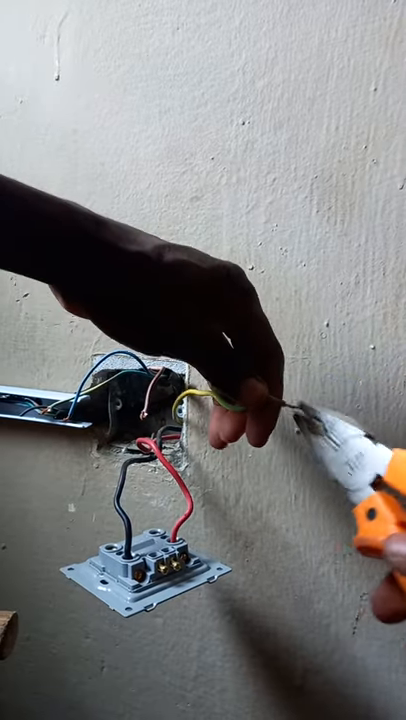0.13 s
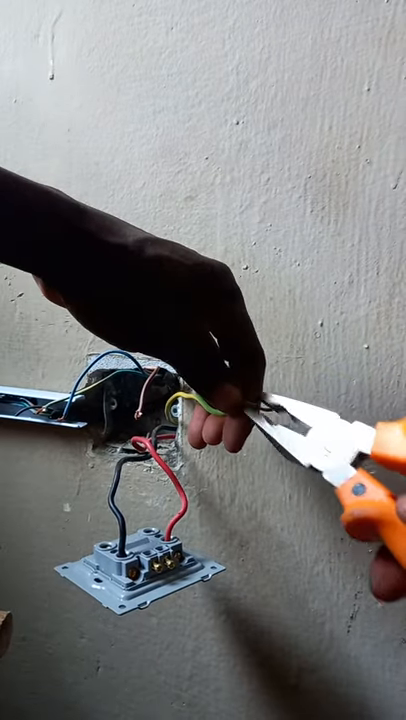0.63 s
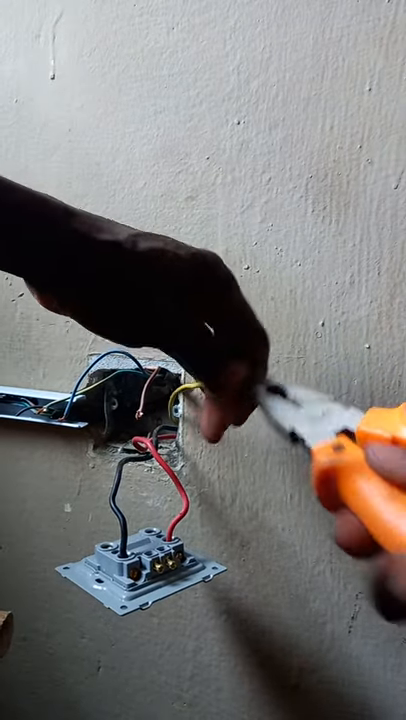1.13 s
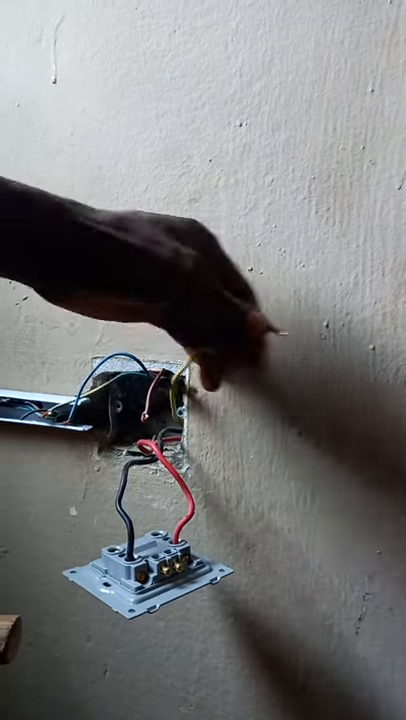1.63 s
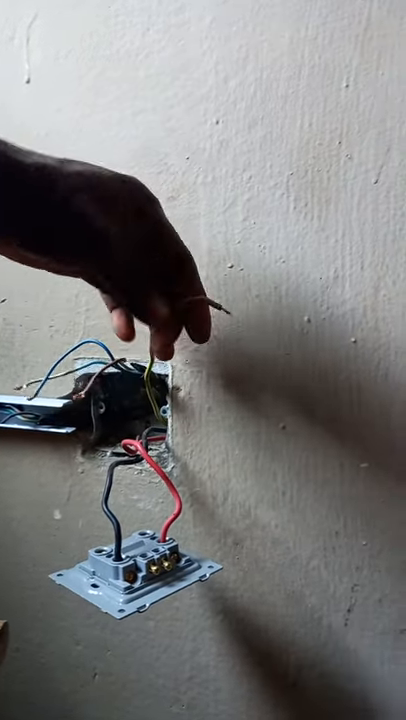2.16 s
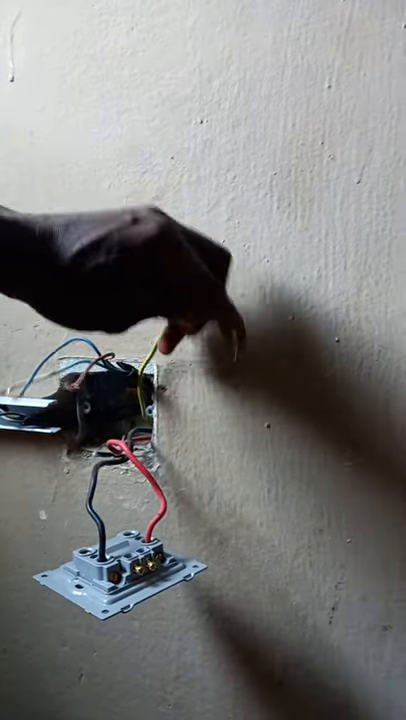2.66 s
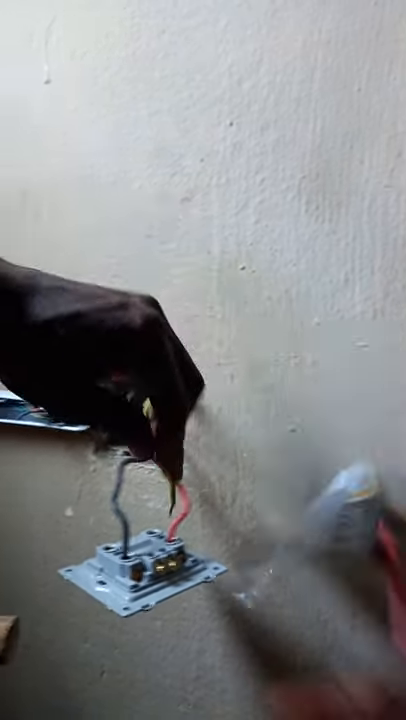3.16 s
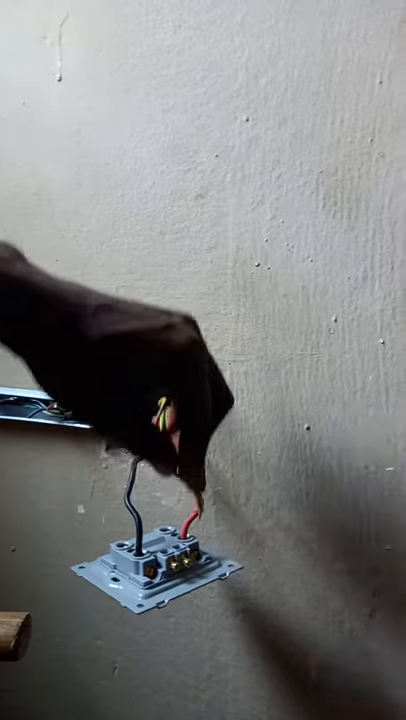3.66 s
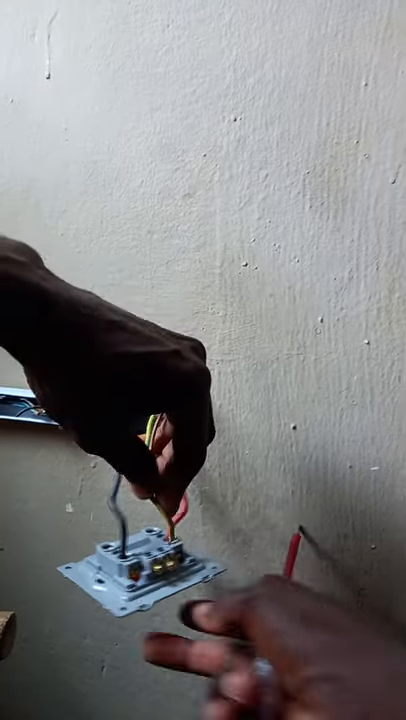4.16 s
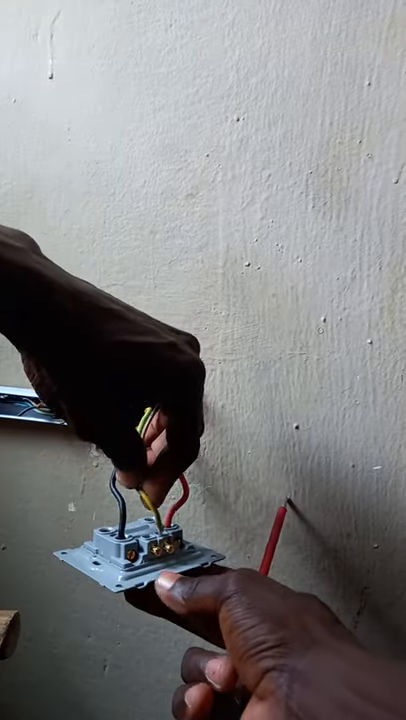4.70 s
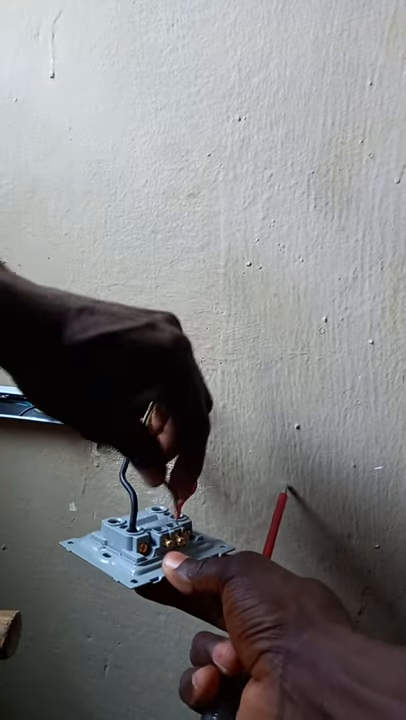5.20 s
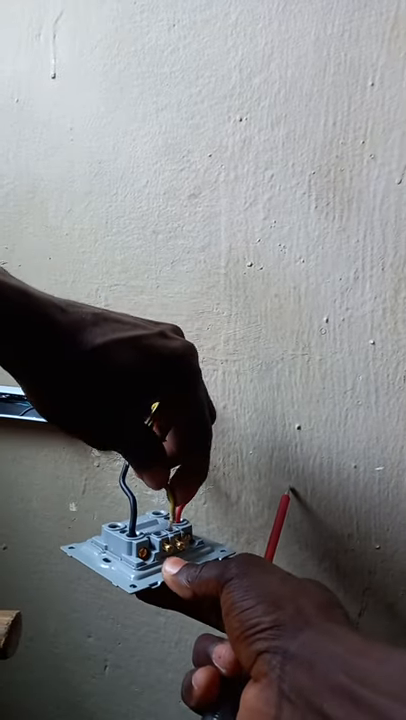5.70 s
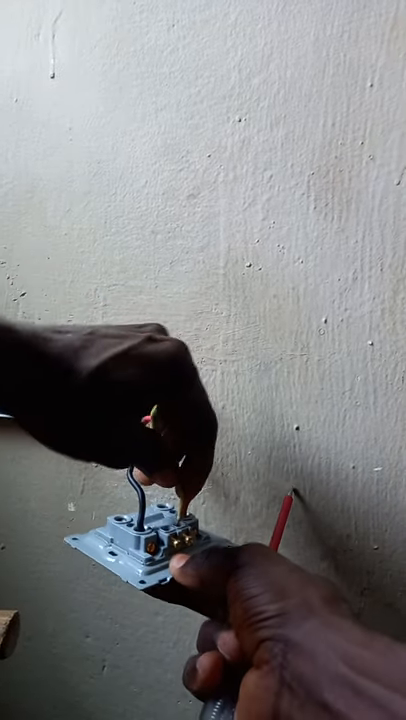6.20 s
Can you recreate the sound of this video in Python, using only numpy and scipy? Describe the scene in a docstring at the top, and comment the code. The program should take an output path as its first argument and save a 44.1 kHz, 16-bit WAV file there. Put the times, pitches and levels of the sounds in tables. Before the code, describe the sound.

Pliers nip a wire and clatter onto a bench, a plastic bag of steel tools crinkles and jingles, then small terminal clicks over faint traffic.

```python
"""Pliers, a bag of tools and a switch terminal

In a small hard-walled room with distant traffic, two microphones stand a hand apart.
Pliers nip and slip off a wire end, then are laid down clattering on a bench: ticks and grit ring their modes.
A plastic bag of steel tools is picked up, crinkling in clumps of grit and jingling in high steel modes.
Last, a wire is pushed into a switch terminal with small clicks. Traffic and hiss are narrow bands of noise."""
import sys
import numpy as np
from scipy import signal
from scipy.io import wavfile

SR = 44100
rng = np.random.default_rng(int(sys.argv[2]) if len(sys.argv) > 2 else 0)


def makeup_ratio(level_db):
    """Linear amplitude ratio for a level in decibels (20 dB per factor of ten)."""
    decades = np.asarray(level_db, float) / 20
    return 10 ** decades


def materialize(psi):
    """Save the field psi as 16-bit PCM at rate SR to the path in sys.argv[1].

    A 1-D psi becomes a single channel; in a 2-D psi each row is a channel.
    """
    bounded = np.clip(np.atleast_2d(psi).T, -1, 1)
    quanta = np.round(bounded * 32767).astype(np.int16)
    wavfile.write(sys.argv[1], SR, quanta)


N = 278878

# The four bands of every contact: lows, mids, treble, air. Each row: low edge in Hz, high edge in Hz.
BANDS = [(300, 1166), (1500, 4252), (5000, 16540), (10000, 15050)]


def at_hz(points, hz):
    """Read a table on a log-frequency axis."""
    table_hz, values = np.array(points)[:, 0], np.array(points)[:, 1]
    return np.interp(np.log(hz), np.log(table_hz), values)


def in_time(rows):
    """Level columns over time; the first is silent outside the table."""
    s, first, *rest = np.transpose(rows)
    t = np.arange(N) / SR
    return [np.interp(t, s, first, left=-150, right=-150)] + [np.interp(t, s, c) for c in rest]


def band(x, low_hz, high_hz):
    """Band-pass that keeps the rms of white noise."""
    sos = signal.butter(2, [low_hz, min(high_hz, .45 * SR)], "band", fs=SR, output="sos")
    return signal.sosfilt(sos, x + 1e-18) * np.sqrt(SR / 2 / (high_hz - low_hz))


def drift(rate):
    """Slow chance, spread 1: noise through two equal poles, one value every 40 samples."""
    r = np.exp(-80 * np.pi * rate / SR)
    noise = rng.standard_normal(N // 40 + 2002)
    slow = signal.lfilter([1], [1, -2 * r, r * r], noise)[2000:]
    return np.interp(np.arange(N) / 40, np.arange(len(slow)), slow / slow.std())


def ring(force, modes):
    """A force sets every mode of a body ringing; modes are (Hz, dB, t60 in s)."""
    out = 0
    for hz, level_db, t60 in modes:
        r, w = makeup_ratio(-60 / (t60 * SR)), 2 * np.pi * hz / SR
        struck = [0, makeup_ratio(level_db) * np.sin(w)]
        out = out + signal.lfilter(struck, [1, -2 * r * np.cos(w), r * r], force + 1e-18)
    return out


def voiced(force, modes):
    """Forces by band become a crack plus the modes that lie in that band."""
    out = 0
    for k, (low, high) in enumerate(BANDS):
        inside = [m for m in modes if low <= m[0] < high]
        out = out + (-1) ** k * band(force[k], low, high) + ring(force[k], inside)
    return out


def grit(per_s, spread_db):
    """Random micro-clicks of uneven size, bands x channels; a wide source sounds partly unlike at each side."""
    # Share of each band (lows, mids, treble, air) that both microphones hear alike, 0 to 1.
    same_grit = [0.716, 0.13, 0.17, 0.13]
    struck = rng.random(N) < per_s / SR
    sizes = makeup_ratio(spread_db * np.minimum(rng.exponential(1, N), 4)) * struck
    shared, *own = rng.standard_normal((3, N))
    alike = np.clip(same_grit, 0, 1)[:, None, None]
    signs = np.sqrt(alike) * shared + np.sqrt(1 - alike) * np.array(own)
    return sizes / np.sqrt(np.mean(sizes ** 2)) * signs


def contacts(s, level_db, low_db, mid_db, ms, pan_db, rise_share, hold_share, tick_db, treble_db, air_db):
    """Each contact is one sharp tick, then a short run of grit that swells, holds and dies."""
    force, ticks = np.zeros((2, len(BANDS), 2, N))
    each = np.broadcast(s, level_db, low_db, mid_db, ms, pan_db)
    for start_s, level, low, mid, length_ms, pan in each:
        length = max(length_ms, .3) * SR / 1000
        rise, hold = rise_share * length + 2, hold_share * length
        k = np.arange(int(8 * length + rise))
        decay = np.exp(-np.maximum(k - rise - hold, 0) / (length - hold))
        shape = np.minimum(k / rise, 1) ** 2 * decay
        colour_db = np.array([low, mid, treble_db, air_db])[:, None]
        gains = makeup_ratio(level + colour_db + [pan / 2, -pan / 2])
        start = int(start_s * SR)
        force[:, :, start + k] += gains[:, :, None] * shape
        ticks[:, :, start] += gains * makeup_ratio(tick_db)
    return force * grit(14000, 1.6) + ticks


def rustle(rows, per_s, spread_db, clump_db, colour_db, dulling, pan_db):
    """Dense grit in clumps; the gentler the handling, the more the lower bands lead."""
    firm_db = -48  # handling gentler than this sounds duller
    treble_db, = in_time(rows)
    # dulling: dB per dB below firm, one for each band
    lead_db = np.array(dulling)[:, None] * (firm_db - treble_db) * (treble_db > -120)
    level = makeup_ratio(treble_db + np.array(colour_db)[:, None] + lead_db)
    clumps = makeup_ratio(clump_db * drift(40)) * makeup_ratio([[pan_db / 2], [-pan_db / 2]])
    return level[:, None] * clumps * grit(per_s, spread_db)


def traffic():
    """Narrow bands of far rumble and microphone hiss, each flickering a little."""
    # Colour of rumble and hiss. Each row: frequency in Hz, relative density in dB per Hz.
    colour = [(15, -38), (25, -2.5), (53, -6), (108, -6.5), (175, -22), (236, -11.5), (285, -17),
              (344, -9.5), (503, -11.5), (560, -11.5), (911, -9), (1400, -46.5), (1700, -33), (6740, -55.5),
              (16000, -47)]
    # The deep rumble swells. Each row: time in seconds, level in dB.
    rumble_swell = [(0, 3.5), (.45, 2), (.7, -1.34), (1.5, 1), (2.6, 1.92), (3.7, 1.85), (4.2, 0.49),
                    (4.8, 4), (5.1, -2), (5.7, -1.22), (6.33, -1)]
    # How alike the two microphones hear it. Each row: frequency in Hz, left-right likeness from -1 to 1.
    likeness = [(50, 1), (130, 0.54), (290, 0.9), (640, 0.49), (1400, -0.86), (3000, 0.29)]
    out, together = 0, drift(1.5)
    edges = 24 * 2 ** np.arange(0, 9.7, .4)
    white = rng.standard_normal((2, 2, N))
    swell_db = in_time(rumble_swell)[0]
    for k, (low, high) in enumerate(zip(edges, edges[1:])):
        mid, side = band(white[k % 2], low, high) * np.sqrt(high - low)
        hz = np.sqrt(low * high)
        alike = np.clip(at_hz(likeness, hz), -1, 1)
        flicker_db = 0.91 * together + 0.58 * drift(11)
        gain = makeup_ratio(at_hz(colour, hz) + flicker_db + swell_db * (hz < 130))
        out = out + gain * (np.sqrt(1 + alike) * mid + np.sqrt(1 - alike) * side * [[1], [-1]])
    return out / out.std() * makeup_ratio(-58.5)


def thuds():
    """The bench booms in low noise bands and one deep mode when weight shifts on it."""
    # Weight shifting on the bench. Each row: time of full weight in seconds, deep force in dB, boom force in dB.
    weight_shifts = [(2.296, -54, -47.5), (2.384, -45, -55.5), (2.93, -67.5, -59), (3.13, -44, -55),
                     (3.342, -47, -56), (3.6, -65.5, -63), (3.91, -55, -57.5)]
    lean_db_per_s, lift_db_per_s = 110.5, 179.5  # how fast the weight comes and goes
    s, *forces_db = np.transpose(weight_shifts)
    late = np.arange(N)[:, None] / SR - s
    swell = makeup_ratio(np.minimum(lean_db_per_s * late, -lift_db_per_s * late))
    deep, boom = rng.standard_normal((2, N)) * [swell @ makeup_ratio(db) for db in forces_db]
    out = makeup_ratio(-10.0) * band(deep, 28, 95)
    out = out + ring(deep, [(100.1, -23.5, 0.095)])
    out = out + band(boom, 150, 320)
    return out * makeup_ratio([[-1.2], [1.2]])


def ping():
    """One short tap, a burst of noise, rings a single high mode of the pliers' jaws by the wall."""
    # One row: time in seconds, mode level in dB, frequency in Hz, t60 in seconds.
    thin_ping = (1.219, -91, 11100, .1)
    s, level_db, hz, t60 = thin_ping
    tap = rng.standard_normal((2, N)) * (np.abs(np.arange(N) / SR - s) < .003)
    return ring(tap, [(hz, level_db, t60)])


def terminal():
    """The wire end scrapes and clicks in the terminal, whose small parts ring for a few ms."""
    # Wire end in the terminal. Each row: start in seconds, level in dB, mids in dB re level.
    terminal_clicks = [(4.329, -67.5, -2), (4.4687, -73, -6.5), (4.614, -51.5, -16.5), (4.796, -37, -14),
                       (4.807, -45.5, -14), (5.07, -72, -9.5), (5.1887, -71.5, -6.5), (5.835, -58, -15),
                       (5.8483, -39.5, -23), (5.8784, -48, -18.5), (5.891, -56, -14), (6.02, -73.5, -22.5)]
    # Modes of the terminal. Each row: frequency in Hz, level in dB, t60 in seconds.
    terminal_modes = [(2360, -10, 0.011), (2850, -12, .009), (3600, -11, 0.012), (9700, -11, 0.006)]
    s, level_db, mid_db = np.transpose(terminal_clicks)
    force = contacts(s, level_db, -21, mid_db, ms=6.56, pan_db=2.78, rise_share=0.21, hold_share=0.132,
                     tick_db=-4.0, treble_db=-14.5, air_db=-8.0)
    return voiced(force, terminal_modes)


def pliers_on_wire():
    """The jaws nip and slip off the wire, each tick and scrape ringing the short steel modes."""
    # Jaws on the wire. Each row: start in seconds, level in dB, mids in dB re level, scrape length in ms.
    wire_clicks = [(0.1107, -56, -10.5, 3.8), (0.125, -53, -14, 4.4), (0.136, -52, -10, 6.76),
                   (0.646, -64.5, -12.5, 7.8), (0.7, -68.5, -15.5, 5.7), (0.731, -64, -18, 5.2),
                   (0.8276, -66, -33.5, 3.8), (0.9053, -62, -29.5, 6.4), (1.397, -39, -17, 2.1),
                   (1.4, -33, -23, 2.3), (1.435, -30.5, -8, 3.39), (1.4384, -27, -12, 3.14),
                   (1.4444, -32, -13.5, 4.5), (1.4524, -32.5, -18.5, 3.9)]
    # Modes of the jaws. Each row: frequency in Hz, level in dB, t60 in seconds.
    jaw_modes = [(2780, -12, .01), (4250, -9, .01), (7700, -24, .004), (13300, -6, .002)]
    s, level_db, mid_db, ms = np.transpose(wire_clicks)
    force = contacts(s, level_db, -33, mid_db, ms, pan_db=0.5, rise_share=0.159, hold_share=0.32,
                     tick_db=13.5, treble_db=-13.0, air_db=-14.5)
    return voiced(force, jaw_modes)


def wall_work():
    """All work at the wall, thin in the bass: small parts give off little below the high-pass."""
    wall = pliers_on_wire() + ping() + terminal()
    return signal.sosfilt(signal.butter(2, 1911, "high", fs=SR, output="sos"), wall)


def bench_scuff():
    """The first soft touch swells slowly and rings the bench top."""
    # First touches on the bench. Each row: start in seconds, level in dB.
    scuffs = [(1.9, -52.5), (1.913, -50.5)]
    # Bench top under the first touch. Each row: frequency in Hz, level in dB, t60 in seconds.
    scuff_modes = [(798.7, -11.5, 0.022), (2500, -18, 0.0086)]
    s, level_db = np.transpose(scuffs)
    force = contacts(s, level_db, 3.1, -10, ms=9, pan_db=-5, rise_share=0.24, hold_share=0.25,
                     tick_db=0.5, treble_db=-11.5, air_db=-23.5)
    return voiced(force, scuff_modes)


def bench_slide():
    """Pliers sliding on the bench make dense grit with no modes."""
    # Pliers sliding. Each row: time in seconds, treble force in dB before colour.
    slide = [(1.9, -99.5), (1.93, -66.5), (2.08, -66), (2.184, -74), (2.238, -49), (2.42, -95.5)]
    force = rustle(slide, per_s=5000, spread_db=2.9, clump_db=3.0, colour_db=[6.5, 2, 4, -11.5],
                   dulling=[0.335, 0.25, 0.014, 0.019], pan_db=0.5)
    return voiced(force, [])


def bench_knocks():
    """The pliers land and rock, each knock ringing the handles."""
    # Landing and rocking. Each row: start in seconds, level in dB, lows in dB re level, mids in dB re level.
    knocks = [(1.989, -23, -12.5, -14), (2.068, -18, -22.5, -19), (2.111, -28.5, -13, -6.5),
              (2.147, -34.5, -15.5, -6), (2.175, -32, -18, -9.5), (2.217, -23, -12, -18.5),
              (2.239, -30.5, -7, -6), (2.283, -31.5, -6, -11.5), (2.315, -40, -1.5, -18.5)]
    # Modes of the handles. Each row: frequency in Hz, level in dB, t60 in seconds.
    handle_modes = [(950, -14, 0.06), (2767, -15, 0.02), (3900, -16, .012)]
    force = contacts(*np.transpose(knocks), ms=4.375, pan_db=-3.0, rise_share=0.13, hold_share=0.12,
                     tick_db=13.0, treble_db=-9.5, air_db=-24.5)
    return voiced(force, handle_modes)


def pliers_on_bench():
    """Touch, slide and knocks together; from this distance they sound dull above the low-pass."""
    bench = bench_knocks() + bench_scuff() + bench_slide()
    return signal.sosfilt(signal.butter(1, 9000, fs=SR, output="sos"), bench)


def jingle():
    """Each touch is a dying chatter of steel on steel that keeps the shafts' high modes singing."""
    # Steel shafts touching each other. Each row: start in seconds, strength in dB.
    shaft_touches = [(2.6888, -67), (2.7252, -71.5), (2.9761, -51), (3.0295, -53.5), (3.0964, -55),
                     (3.1527, -51), (3.1956, -50.5), (3.2294, -59.5), (3.3039, -59.5), (3.3273, -45),
                     (3.3518, -50), (3.4526, -47), (3.4794, -55), (3.5194, -55.5), (3.7405, -31),
                     (3.7564, -39), (3.7794, -50), (3.8094, -45), (3.825, -45.5), (3.8706, -45),
                     (3.9135, -44.5), (3.9684, -57)]
    # Modes of the shafts. Each row: frequency in Hz, level in dB, t60 in seconds.
    shaft_modes = [(10615, -10.5, 0.045), (10555, -10.5, .05), (10490, -20, .04), (10100, -26.5, .03),
                   (10300, -22, .03), (10870, -19, 0.03)]
    s, strength_db = np.transpose(shaft_touches)
    touches = np.zeros(N)
    touches[(s * SR).astype(int)] = makeup_ratio(strength_db)
    dying = signal.lfilter([1], [1, -np.exp(-1 / (0.0098 * SR))], touches + 1e-18)
    chatter = dying * grit(1600, 2.52)[2]  # grit as alike as in the treble band
    return ring(chatter, shaft_modes) * makeup_ratio([[1.5], [-1.5]])


def bag_film():
    """Folds of the bag snap over amid crinkling grit, and the film rings briefly."""
    # Folds snapping. Each row: start in seconds, level in dB, lows in dB re level, mids in dB re level.
    bag_snaps = [(2.625, -41.5, -42.5, -14), (2.6888, -49, -15.5, -19.5), (2.9158, -43.5, -1, -11),
                 (2.9302, -37, -9.5, -9.5), (2.9557, -43, 1, -31.5), (2.9707, -20.5, -30, -17),
                 (3.0454, -44, -4, -15), (3.0935, -24.5, -11, -12), (3.1507, -34, -4, -19.5),
                 (3.1702, -26, -15, -24), (3.2712, -37.5, -9.5, -9), (3.2833, -38.5, -12, -4),
                 (3.3149, -22, -11.5, -14.5), (3.3258, -27, -8.5, -33.5), (3.3424, -30, -3.5, -10),
                 (3.3521, -33.5, -7, -12), (3.3877, -38.5, -11.5, -14.5), (3.4187, -23, -26, -13),
                 (3.454, -35, -11, -23.5), (3.5234, -41, -32.5, -16.5), (3.7385, -18.5, -19, -24.5),
                 (3.745, -20, -25, -26), (3.775, -34.5, -29, -21.5), (3.8681, -22.5, -10, -38.5),
                 (3.91, -32.5, -32, -34), (3.966, -46, -16.5, -15), (4.115, -50, 6, -4.5),
                 (4.135, -57, 5, 2)]
    # The bag swings across. Each row: time in seconds, left over right in dB.
    bag_place = [(2.62, -8), (3.04, -3.5), (3.1, 11), (3.281, 2.5), (3.42, 12.5), (3.751, 16), (4.12, -4.5)]
    # How hard the bag is handled. Each row: time in seconds, treble force in dB before colour.
    handling = [(2.48, -99), (2.512, -86), (2.62, -90.5), (2.624, -66), (2.77, -91), (2.9, -80.5),
                (2.968, -49), (3.08, -73.5), (3.096, -42.5), (3.26, -56), (3.322, -44.5), (3.526, -66),
                (3.62, -92.5), (3.735, -88), (3.745, -37), (3.76, -53), (3.844, -60), (3.872, -40),
                (4.08, -95.5), (4.11, -90.5), (4.118, -76), (4.14, -66), (4.22, -104)]
    # Modes of the film. Each row: frequency in Hz, level in dB, t60 in seconds.
    film_modes = [(1021, -19.5, .012), (1218, -22, 0.0041), (3000, -26.5, 0.0092), (4080, -21, .02)]
    place_db = np.interp(np.transpose(bag_snaps)[0], *np.transpose(bag_place))
    snaps = contacts(*np.transpose(bag_snaps), ms=8.45, pan_db=place_db, rise_share=0.22, hold_share=.45,
                     tick_db=-0.5, treble_db=-18.0, air_db=-8.5)
    crinkle = rustle(handling, per_s=2500, spread_db=2.4, clump_db=2.2, colour_db=[0.5, 1.53, 0.5, 5.0],
                     dulling=[0.4, 0.0, 0.118, 0.051], pan_db=0.0)
    return voiced(snaps + crinkle, film_modes)


def arrive(x, lag):
    """The left microphone hears it lag samples after the right."""
    n = np.arange(N)
    return np.array([np.interp(n - lag / 2 * side, n, c) for c, side in zip(x, (1, -1))])


def room(x, wet_db, gap_ms):
    """Reflections: noise that dies band by band, its own in each channel."""
    # Reverberation of the room. Each row: frequency in Hz, t60 in seconds.
    room_t60 = [(300, 0.14), (1500, 0.14), (5000, 0.16), (14000, 0.1517)]
    t, edges = np.arange(SR // 2) / SR, 100 * 2 ** np.arange(0, 8.)
    white = rng.standard_normal((2, len(t)))
    tail = 0
    for k, (low, high) in enumerate(zip(edges, edges[1:])):
        decay = makeup_ratio(-60 * t / at_hz(room_t60, np.sqrt(low * high)))
        tail = tail + (-1) ** k * band(white, low, high) * np.sqrt(high - low) * decay
    tail = tail * np.clip(t * 1000 / gap_ms, 0, 1)  # the reflections build up over the first few ms
    tail = tail / np.sqrt((tail ** 2).sum(axis=1).mean())
    return makeup_ratio(wet_db) * signal.fftconvolve(x.mean(axis=0)[None], tail)[:, :N]


def scene():
    """Wall work arrives from the left, bench and bag from the right."""
    wall = arrive(wall_work(), -18)
    bench = arrive(pliers_on_bench(), 18)
    bag = arrive(bag_film() + jingle(), 14)
    near = wall + bench + bag
    return near + room(near, wet_db=-7.5, gap_ms=5.0) + thuds() + traffic()


def top_cut(x):
    """Nothing passes above the cut-off."""
    return signal.sosfilt(signal.butter(12, 16990, fs=SR, output="sos"), x)


def record(dry):
    """The microphones lose the deepest bass, the left one has a dip; the top is cut."""
    # The left microphone's housing swallows a band. One row: centre in Hz, width in Hz, depth in dB.
    left_dip = (783, 1400, -13)
    hz, width_hz, dip_db = left_dip
    b, a = signal.iirpeak(hz, hz / width_hz, fs=SR)
    left = dry[0] - (1 - makeup_ratio(dip_db)) * signal.lfilter(b, a, dry[0])
    mix = np.array([left, dry[1]])
    mix = signal.sosfilt(signal.butter(6, 43, "high", fs=SR, output="sos"), mix)
    mix = signal.sosfilt(signal.cheby2(10, 25, 16300, fs=SR, output="sos"), mix)
    return top_cut(mix)


dry = scene()
out = record(dry)
materialize(out)
```